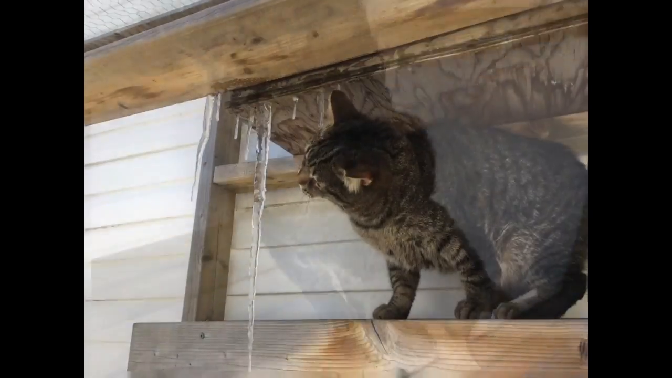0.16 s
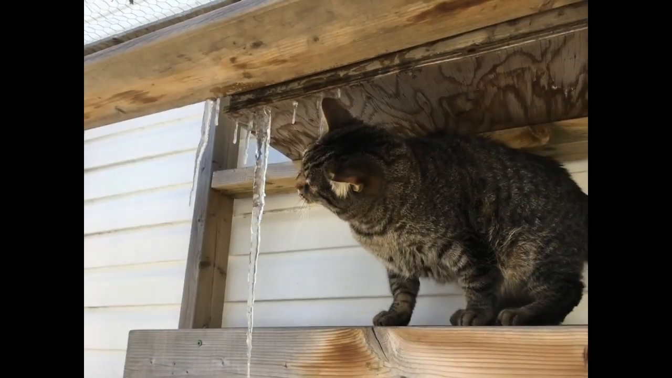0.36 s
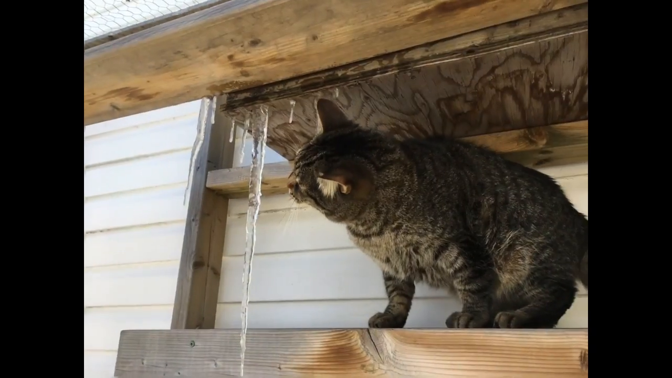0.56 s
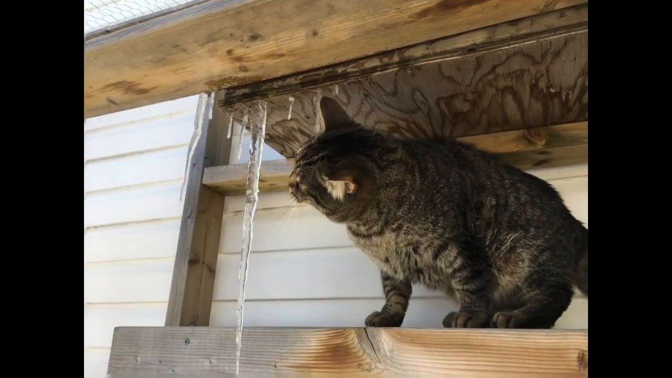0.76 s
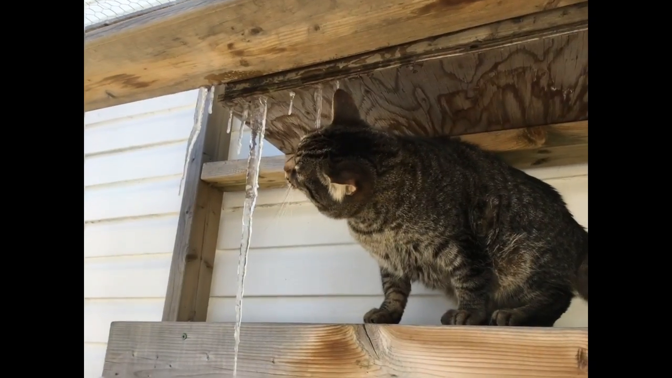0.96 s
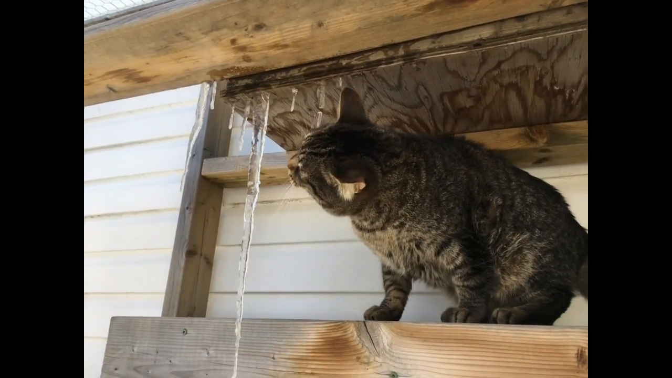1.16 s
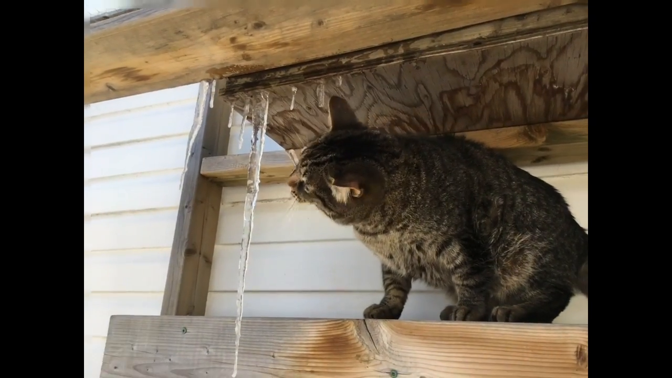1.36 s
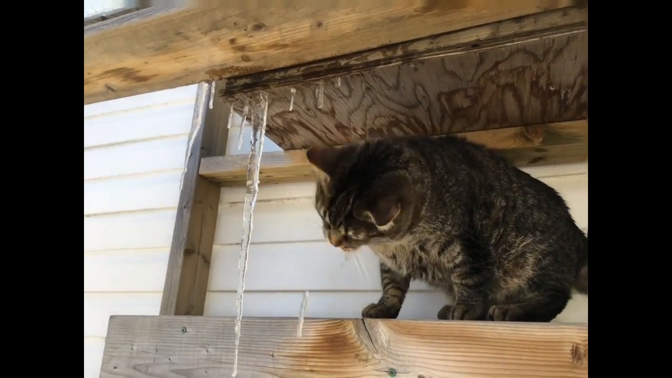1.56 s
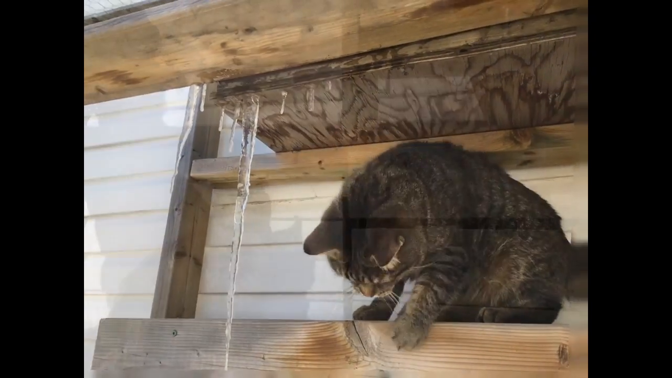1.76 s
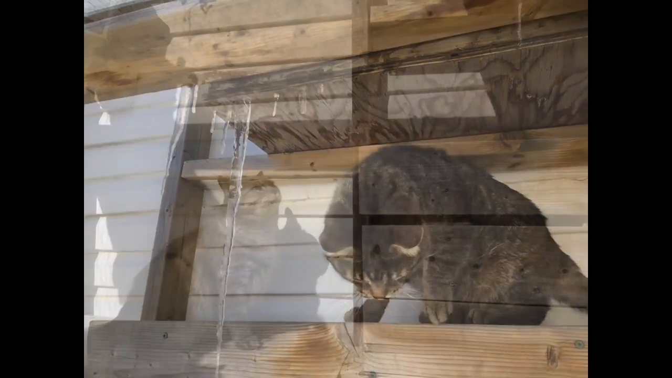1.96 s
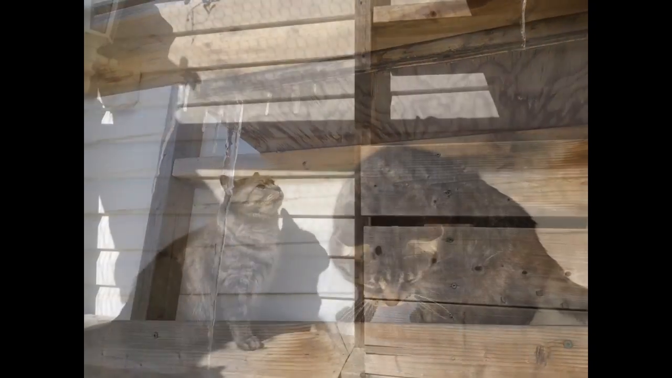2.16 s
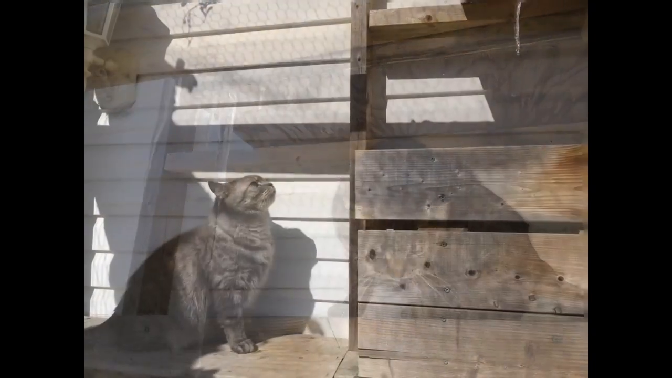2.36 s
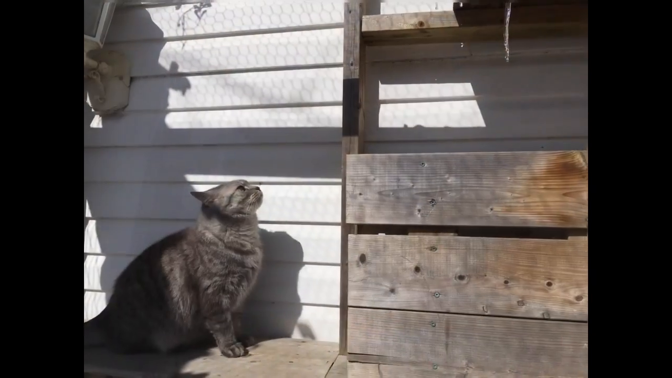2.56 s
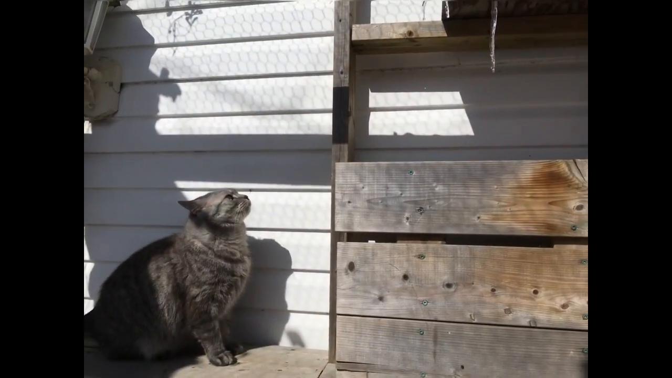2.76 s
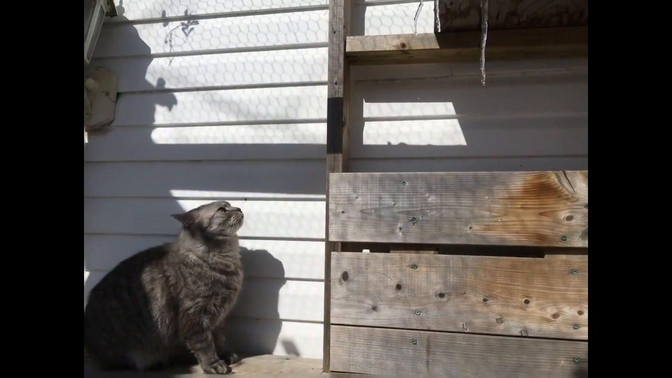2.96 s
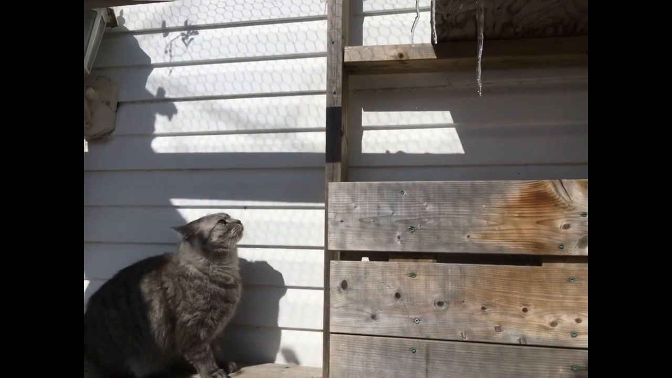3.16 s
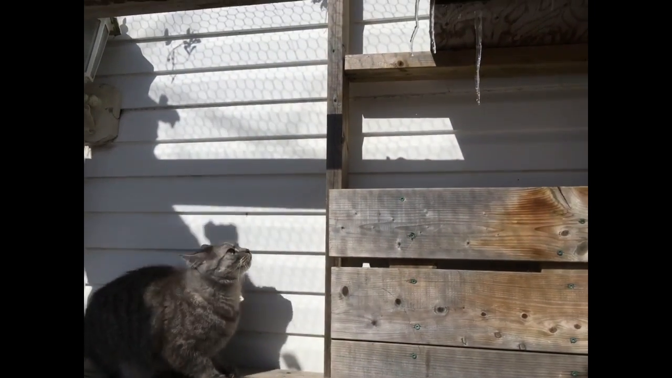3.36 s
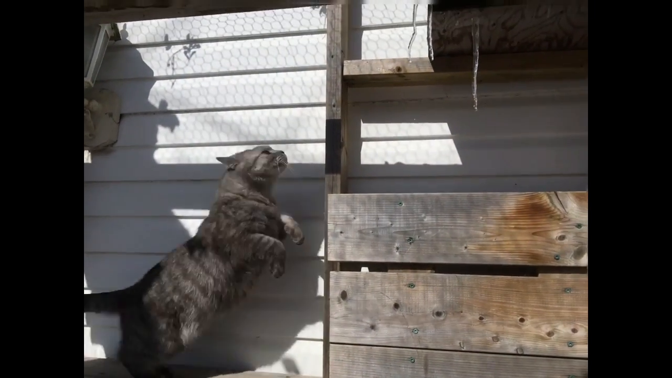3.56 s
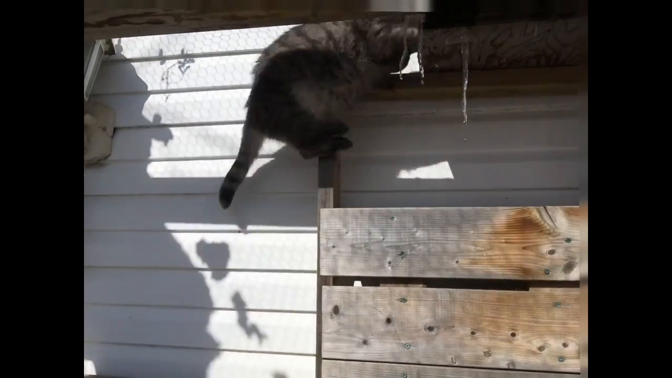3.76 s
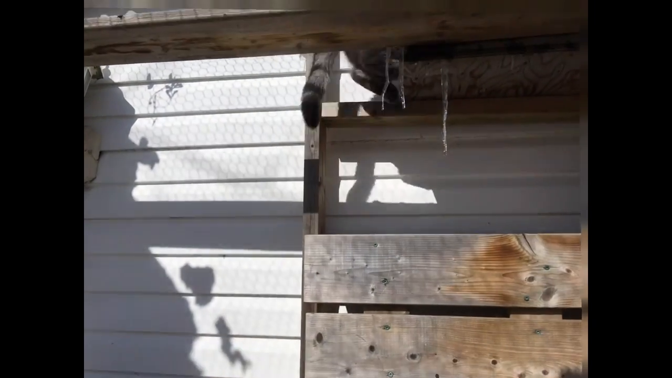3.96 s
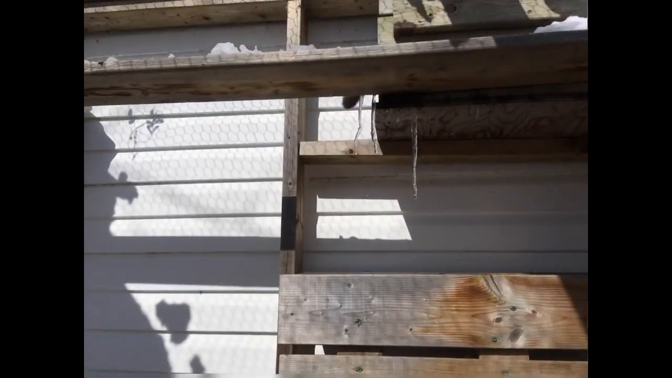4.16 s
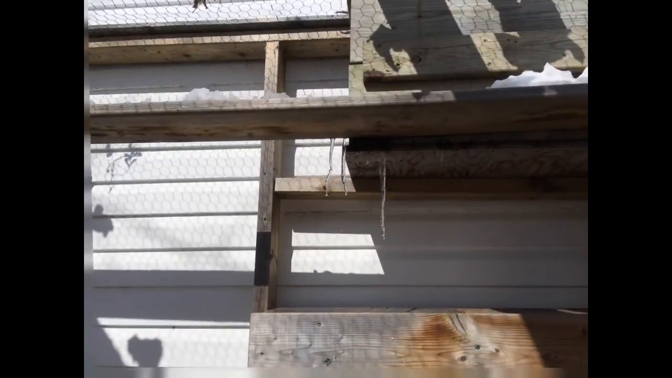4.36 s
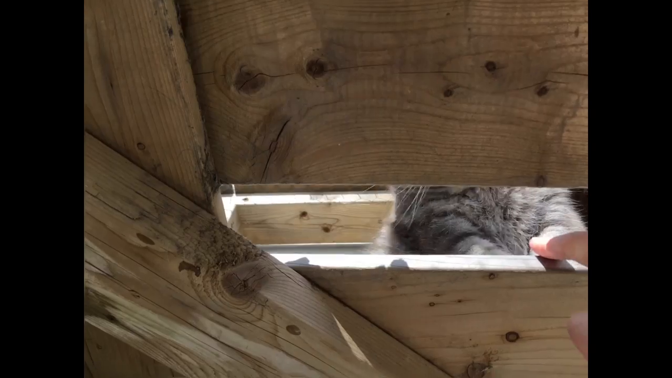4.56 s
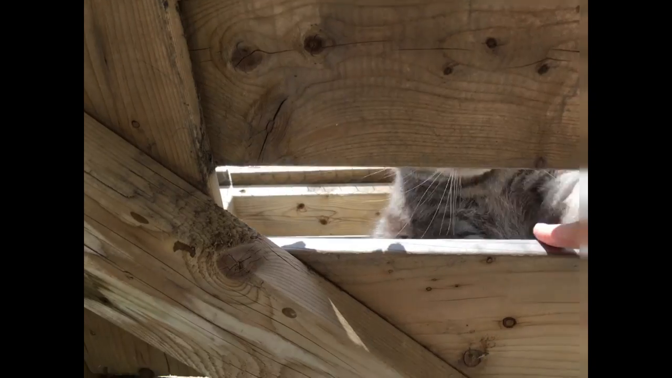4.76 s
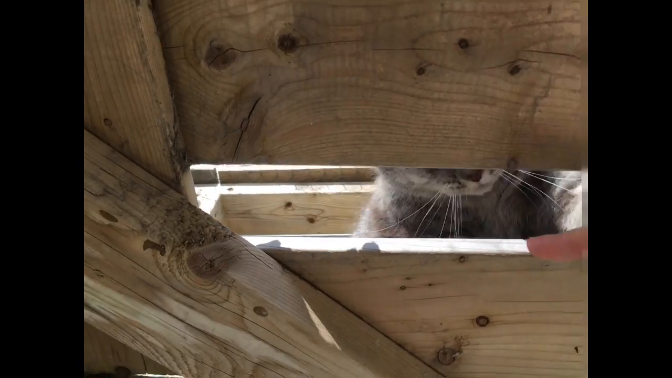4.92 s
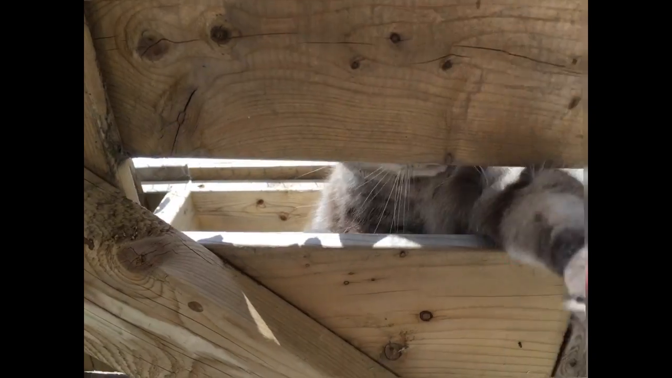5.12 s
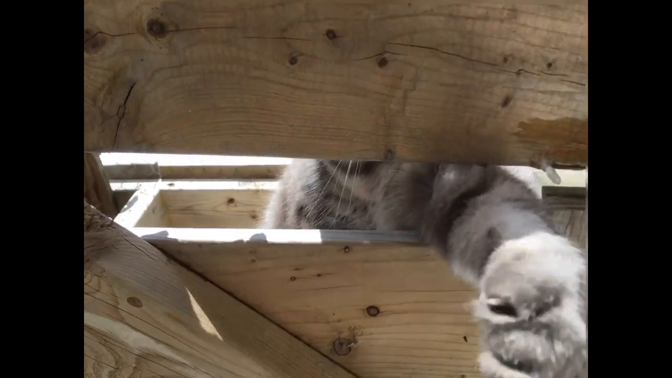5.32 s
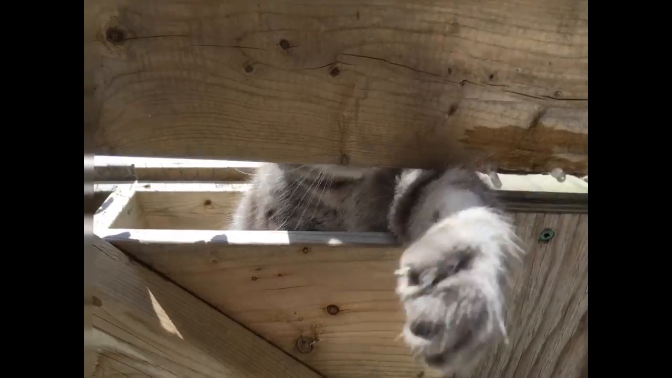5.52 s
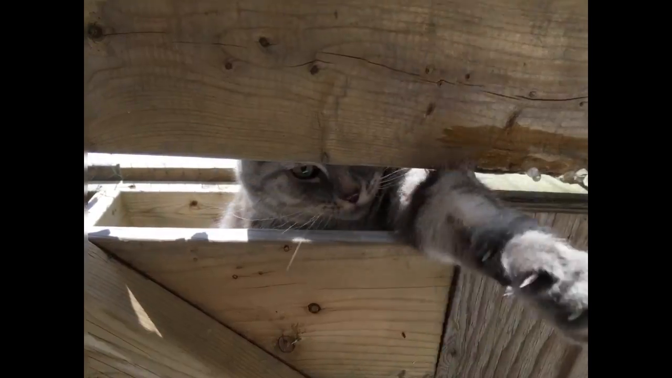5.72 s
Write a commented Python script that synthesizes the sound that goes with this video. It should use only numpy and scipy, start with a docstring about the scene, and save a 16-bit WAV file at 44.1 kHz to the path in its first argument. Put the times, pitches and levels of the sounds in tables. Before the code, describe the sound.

Close to the microphone in a small wooden outdoor pen, a low electric hum runs under faint tooth clicks. An icicle cracks loudly, then its shards clatter and ring on a plank as the hum dies away. After a quiet spell, a cat jumps with a sharp click, thumps and scrapes its claws on boards, then fur and paws brush softly against wood.

```python
"""A cat gnaws an icicle under the roof of a wooden outdoor pen; it snaps off and clatters onto a plank.
A second cat scrambles up the boards, its claws scrape, and fur brushes along the wood.
Breaks, clicks and rubbing are shaped noise; ringing ice, hollow knocks and boards are fading sine waves.
The pen adds a short echo; an electric hum of sine waves and noise dies away over a low outdoor rumble."""
import sys
import numpy as np
from scipy import signal
from scipy.fft import rfft, irfft, next_fast_len
from scipy.io import wavfile
from scipy.ndimage import uniform_filter1d

SR = 44100
rng = np.random.default_rng(int(sys.argv[2]) if len(sys.argv) > 2 else 0)


def generate_wav(sig):
    """Save sig (samples, or channels by samples) to the path in sys.argv[1] as 16-bit PCM at SR."""
    pcm = np.round(np.clip(np.atleast_2d(sig).T, -1, 1) * 32767).astype(np.int16)
    wavfile.write(sys.argv[1], SR, pcm)


N = 259656
T = np.arange(N) / SR

# tone of fur on wood, also used for the faint hiss: (frequency [Hz], level [dB])
FUR_COLOUR = [(290, -36.5), (500, -10), (749, -12), (1110, -9), (1320, -10), (1680, -12.5), (2870, -9),
              (4560, -13), (10200, -9), (11300, -5.5), (15800, -11.5)]


def undb(db):
    """Decibels to gain."""
    return 10 ** (np.asarray(db) / 20)


def unit(x):
    """Scale to an rms (average strength) of 1."""
    return x / np.sqrt(np.mean(x ** 2))


def curve(rows):
    """Gain over time from (time [s], level [dB]) rows."""
    s, db = np.transpose(rows)
    return undb(np.interp(T, s, db))


def add(out, s, x):
    """Mix x into out from time s."""
    i = int(s * SR)
    out[i:i + len(x)] += x[:N - i]


def fade(t, t60):
    """Exponential decay that has dropped 60 dB after t60 seconds."""
    return np.exp(-np.log(1000) * t / t60)


def colour(x, points):
    """Filter through (frequency [Hz], level [dB]) points, with no sound ahead of its cause."""
    size = 2 * next_fast_len(len(x))
    hz, db = np.transpose(points)
    f = np.maximum(np.arange(size // 2 + 1) * SR / size, 1)
    log_gain = np.log(undb(np.interp(np.log(f), np.log(hz), db)))
    # folding the cepstrum onto its first half makes the filter respond only after its input
    cepstrum = irfft(log_gain)
    cepstrum[1:size // 2] *= 2
    cepstrum[size // 2 + 1:] = 0
    response = np.exp(rfft(cepstrum))
    return irfft(rfft(x, size) * response)[:len(x)]


def walk(rate):
    """Slow random wandering with a spread near 1, given about rate new values a second."""
    k = int(SR / rate)
    steps = np.repeat(rng.standard_normal(N // k + 1), k)
    smooth = uniform_filter1d(uniform_filter1d(steps, k), k)
    return unit(smooth[:N])


def grains(size, spread_db):
    """Dense micro-fractures or slips, a few much larger than the rest."""
    boost_db = spread_db * np.minimum(rng.exponential(size=size), 4)
    return rng.standard_normal(size) * undb(boost_db)


def burst(points, db, t60):
    """One sharp break and its crumbling, levelled over the first 5 ms."""
    t = T[:8192]
    push = unit(grains(len(t), spread_db=2.5)) * fade(t, t60)
    push[0] = 3.5  # the sharp first break
    x = colour(push, points)
    return x * undb(db) / np.sqrt(np.mean(x[t < .005] ** 2))


def rings(modes, rise_s):
    """Struck modes (natural tones of an object) swell quickly and die away."""
    out, t = np.zeros(N), T[:SR // 4]
    for s, hz, db, t60 in modes:
        swell = 1 - np.exp(-t / rise_s)
        add(out, s, undb(db) * np.sin(2 * np.pi * hz * t) * fade(t, t60) * swell)
    return out


def strokes(rows):
    """Gain over time: each stroke swells to its peak and eases off, 20 dB down at its rise and fall times."""
    shape = 1.47  # 1 is a pointed swell, 2 a rounded one
    power = 0
    for s, db, rise, fall in rows:
        away = np.minimum(np.maximum((s - T) / rise, (T - s) / fall), 10)
        power = power + undb(db - 20 * away ** shape) ** 2
    return np.sqrt(power)


def rub(points, rows, spread_db, flutter_db):
    """Countless tiny slips of a soft surface over a rough one."""
    slips = unit(colour(grains(N, spread_db), points))
    flutter = undb(flutter_db * walk(90))
    return slips * strokes(rows) * flutter


def background(swell_db=1.86):
    """An electric motor and its rush of air die away over the quiet outdoors."""
    # motor shaft, its second harmonic, mains hum, faint whine, ahead of the fade:
    # (frequency [Hz], level [dB])
    hum_tones = [(29.3, -62), (58.7, -57.5), (120, -49.5), (581, -70.5)]
    # loudness of the hum and rush, fading out from about 1.8 s: (time [s], level [dB])
    fade_rows = [(0, 1), (.6, -1.5), (1.8, -.5), (2.2, -6), (2.45, -17.5), (2.7, -29), (5.88, -43)]
    # tone of the motor's rush of air: (frequency [Hz], level [dB])
    rush_colour = [(25, -11.5), (50, -5.5), (85, -1), (125, -12), (170, -9.5), (280, -15.5), (450, -23.5),
                   (900, -30), (2000, -41), (5000, -58.5)]
    # tone of the outdoor rumble: (frequency [Hz], level [dB])
    air_colour = [(12, -36.5), (20, -8), (81, -4.5), (203, -18.5), (284, -19.5), (496, -30.5), (586, -29.5),
                  (1250, -38.5), (1430, -37), (1790, -42), (2720, -38.5), (4890, -43.5), (11600, -40),
                  (15800, -39.5)]
    rush_db, air_db = -58.5, -61.5  # the rush level is ahead of its swell and the fade
    hum = sum(undb(db) * np.sin(2 * np.pi * (hz * T + rng.random())) for hz, db in hum_tones)
    rush = undb(rush_db) * unit(colour(rng.standard_normal(N), rush_colour))
    air = undb(air_db) * unit(colour(rng.standard_normal(N), air_colour))
    swell = undb(swell_db * walk(5.1))
    return (hum + rush * swell) * curve(fade_rows) + air


def strays(spread_db=2, spread_octaves=0.37, width=0.96):
    """Faint clicks scattered while the cats gnaw and climb, as rows like the clearer clicks in ticks."""
    # spells of fidgeting: (start [s], end [s])
    spells = [(.05, 1), (1.75, 2.2), (3.95, 4.15)]
    per_s, middle_db, middle_hz = 6, -71.5, 4000
    rows = []
    for start, end in spells:
        for slot in np.arange(start, end, 1 / per_s):
            pitch, size = rng.standard_normal(2)
            s = slot + rng.random() / per_s
            hz = middle_hz * 2 ** (spread_octaves * pitch)
            rows.append((s, hz, middle_db + spread_db * size, width))
    return rows


def ticks(skirt_db=-30, t60=0.022):
    """Small contacts, each with one broad resonance."""
    # clearer clicks of teeth, claws and chips of ice:
    # (time [s], centre [Hz], level [dB], width [octaves])
    clear_clicks = [(0.101, 1700, -60, 0.5), (.543, 7500, -56.5, .35), (.597, 3000, -66, 1.4),
                    (0.649, 8300, -55, 0.28), (.694, 10300, -57, 0.11), (.735, 1110, -65, 0.078),
                    (0.9, 3020, -59, 0.37), (1.102, 2500, -56, 0.16), (1.4, 4470, -60.5, 0.92),
                    (1.726, 7350, -37, 0.35), (1.729, 1070, -47, 0.78), (1.761, 3700, -53, 0.16),
                    (1.835, 1475, -63.5, 1.7), (2.19, 1800, -63, .35), (2.485, 1840, -65.5, 0.31),
                    (2.582, 2325, -63.5, 0.73), (3.512, 13000, -59, .5), (3.552, 2200, -54, 1.9),
                    (3.559, 7100, -58.5, 0.99), (3.7058, 2630, -36.5, 0.75), (3.928, 1360, -54, 1.7),
                    (4.045, 5980, -58.5, 2.1), (4.152, 3160, -48, 0.36), (4.282, 1970, -46.5, 0.48),
                    (4.487, 2470, -59, 2.5), (4.529, 2800, -62, 1.5), (4.981, 13100, -58, 0.15),
                    (5.317, 14100, -48, 0.18)]
    out, hz = np.zeros(N), np.geomspace(100, 20000, 120)
    for s, centre, db, width in clear_clicks + strays():
        hump = np.exp(-.5 * (np.log2(hz / centre) / width) ** 2)
        shape = undb(skirt_db) + hump
        add(out, s, burst(np.c_[hz, 20 * np.log10(shape)], db, t60))
    return out


def cracks(trim_db=-1.0):
    """Ice breaking and landing, and claws striking home: one colour, tilted dull or bright."""
    # brittle cracks and impacts, levels ahead of the trim:
    # (time [s], level [dB], bass tilt [dB], treble tilt [dB], t60 [s])
    breaks = [(.112, -54, 21, -8, 0.16), (1.102, -53.5, 10, -12, 0.021), (1.213, -18.5, -6, 8, 0.026),
              (1.52, -50, -19, 3.5, 0.017), (1.7267, -37.5, -29, -15, 0.02),
              (1.7608, -49.5, 12, -25, 0.043), (1.917, -29, -10.5, -12.5, 0.11),
              (1.9241, -20.5, -6, 0.5, 0.025), (1.9776, -37, 12, 8, 0.0048),
              (2.0263, -29.5, -3.5, -7.5, 0.062), (2.0547, -30.5, -16.5, -9, 0.063),
              (2.091, -40, -4.5, -11.5, 0.077), (2.298, -40.5, -7.5, 12.5, 0.092),
              (2.325, -54, 5.5, -16, 0.051), (2.408, -53, 5, -14, 0.07), (3.697, -46, -17, -11, 0.02),
              (3.7044, -32, -27.5, -4, 0.014), (3.9922, -32, -2, -4, .034),
              (5.3011, -46.5, -13.5, 11, 0.0073), (5.317, -44, -4, 3.5, 0.012)]
    # where the bass tilt, level pivot and treble tilt sit: (frequency [Hz])
    tilt_hz = [405, 3344, 13700]
    # tone shared by all cracks: (frequency [Hz], level [dB])
    shared_colour = [(100, -10), (400, -1.5), (1400, 0.5), (3300, 0.5), (7500, -3), (13500, 0.5)]
    out = np.zeros(N)
    hz, shared_db = np.transpose(shared_colour)
    for s, db, bass, treble, t60 in breaks:
        tilt = np.interp(np.log(hz), np.log(tilt_hz), [bass, 0, treble])
        add(out, s, burst(np.c_[hz, shared_db + tilt], db + trim_db, t60))
    return out


def thumps():
    """Brief hollow knocks of jaw, ice and paws, each one fading tone."""
    # knocks: (time [s], pitch [Hz], level [dB], t60 [s])
    hollow_knocks = [(.112, 324, -43.5, 0.057), (1.103, 817, -46.5, 0.042), (2.413, 884, -52.5, .035),
                     (3.93, 213, -52.5, 0.13), (3.995, 181.6, -46, 0.11), (4.205, 217, -57, 0.11)]
    return rings(hollow_knocks, rise_s=0.00068)


def planks(trim_db=-3, spot_db=2.0, detune=.006):
    """Boards ring when struck, a little differently at every spot; soft paws reach only the low modes."""
    # blows; a cat's weight damps the board, levels ahead of the trim:
    # (time [s], level [dB], hardness as a corner [Hz], share of the ring time left [0-1])
    blows = [(0.114, -68, 400, 0.73), (1.918, -34.5, 2000, 0.69), (1.978, -36.5, 300, 0.17),
             (2.056, -49, 2010, 0.97), (2.095, -49, 2000, 0.78), (2.41, -66, 1470, 1),
             (3.703, -48.5, 586, 0.61), (3.998, -38.5, 490, 0.56), (5.537, -60.5, 716, .6)]
    # modes of a plank, ahead of the chance at each spot and the damping:
    # (frequency [Hz], level [dB], t60 [s])
    modes = [(214.4, -6, 0.22), (268.5, -6, 0.26), (424, -6, 0.1), (548.6, -5.5, 0.35), (611, -8, 0.085),
             (958.5, 3.5, 0.12), (1024, 7, 0.078), (1275, -5, .09), (1500, -6.5, 0.23), (1637, 5, 0.072),
             (2140, -3, 0.098)]
    out, t = np.zeros(N), T[:SR // 3]
    for s, db, corner, ring in blows:
        for hz, mode_db, t60 in modes:
            size, pitch = rng.standard_normal(2)
            softness = np.hypot(1, (hz / corner) ** 2)
            level = undb(db + mode_db + trim_db + spot_db * size)
            gain = rng.choice([-1, 1]) * level / softness
            tone = np.sin(2 * np.pi * hz * (1 + detune * pitch) * t)
            add(out, s, gain * tone * fade(t, t60 * ring))
    return out


def rustling():
    """Soft, dull rubbing made of tiny slips, with an uneven flutter."""
    # strokes: (peak time [s], level [dB], rise [s], fall [s])
    rows = [(.64, -69, 0.02, .03), (.742, -67.5, 0.016, 0.014), (.86, -67, 0.018, 0.08),
            (2.72, -75.5, 0.076, 0.19), (2.87, -67, 0.082, 0.17), (3.041, -66.5, .04, .07),
            (3.13, -64, 0.092, 0.046), (3.53, -58, 0.05, 0.084), (3.701, -59.5, 0.033, .03),
            (3.98, -56.5, .04, 0.031), (5.549, -71, .015, .07)]
    # tone: (frequency [Hz], level [dB])
    points = [(300, -7.5), (900, -4), (1700, -6), (2700, -2), (4500, -11.5), (8000, -21), (15000, -13.5)]
    return rub(points, rows, spread_db=6, flutter_db=3.5)


def ice():
    """Snapped icicles and loose shards ring in their modes, the shortest shards highest."""
    # an icicle snaps and rings: (time [s], level [dB])
    snaps = [(1.213, -8), (5.317, -38.5)]
    # modes of a hanging icicle, levels relative to the snap: (frequency [Hz], level [dB], t60 [s])
    icicle_modes = [(2894, -2, 0.021), (3410, -14, .032), (3560, -25.5, .05), (9390, -10, .024),
                    (12280, -7, .005)]
    # shards set ringing: (time [s], pitch [Hz], level [dB])
    shard_hits = [(1.4, 14600, -50), (1.518, 14600, -61), (1.7605, 14700, -51.5), (1.918, 9430, -22),
                  (1.9245, 14540, -20), (2.054, 15350, -33), (2.089, 15000, -33), (2.3, 14800, -41)]
    # modes of a short shard, relative to its hit: (pitch ratio [1], level [dB], t60 [s])
    shard_modes = [(1, 2.5, 0.044), (1.2, -16.5, 0.015), (0.95, -10, 0.0623)]
    icicles = [(s, hz, db + mode_db, t60)
               for s, db in snaps for hz, mode_db, t60 in icicle_modes]
    shards = [(s, hz * ratio, db + mode_db, t60)
              for s, hz, db in shard_hits for ratio, mode_db, t60 in shard_modes]
    return rings(icicles + shards, rise_s=.001)


def hiss(edge_s=.02):
    """A faint, even, bright hiss from 1.23 to 1.62 s with short soft edges."""
    # its one spell: (start [s], end [s], level [dB])
    spell = (1.23, 1.62, -69)
    start, end, db = spell
    gate = np.clip(np.minimum(T - start, end - T) / edge_s + .5, 0, 1)
    return undb(db) * gate * unit(colour(rng.standard_normal(N), FUR_COLOUR))


def creak(width_hz=800):
    """The icicle creaks between the teeth: uneven stick-slip excites one broad, rising resonance."""
    # loudness: (time [s], level [dB])
    loudness = [(1.345, -100), (1.356, -64), (1.37, -60.5), (1.382, -62), (1.395, -66), (1.415, -100)]
    # rising centre of the resonance: (time [s], pitch [Hz])
    pitch_rows = [(1.35, 2232), (1.41, 2460)]
    pitch = np.interp(T, *np.transpose(pitch_rows))
    phase = 2 * np.pi * np.cumsum(pitch) / SR
    # two random strengths smear the tone into a band
    band = walk(width_hz) * np.cos(phase) + walk(width_hz) * np.sin(phase)
    return band * curve(loudness)


def gusts():
    """Puffs of wind thud on the microphone as short swells of low noise."""
    # soft puffs: (peak time [s], level [dB], length [s])
    puffs = [(2.523, -50, .018), (2.582, -52.5, 0.0099), (3.385, -47.5, 0.016)]
    points = [(20, -14.5), (45, 2), (65, 6.0), (110, -9.5), (300, -47), (2000, -90.5)]  # (Hz, dB)
    rumble = unit(colour(rng.standard_normal(N), points))
    swells = sum(undb(db) * np.exp(-.5 * ((T - s) / length) ** 2) for s, db, length in puffs)
    return rumble * swells


def brushing():
    """Paws and fur brush the wood in countless tiny slips."""
    # strokes: (peak time [s], level [dB], rise [s], fall [s])
    rows = [(3.55, -70, 0.056, 0.2), (3.875, -62, 0.072, .06), (3.992, -39.5, .032, 0.0075),
            (4.6, -58, 0.017, 0.087), (4.745, -61, 0.055, 0.094), (4.882, -54.5, 0.043, 0.09),
            (4.991, -60, 0.014, .11), (5.13, -64, 0.066, 0.061), (5.2, -65, 0.071, 0.057),
            (5.32, -63.5, 0.12, 0.17), (5.721, -74, 0.32, 0.45)]
    return rub(FUR_COLOUR, rows, spread_db=1.0, flutter_db=2.5)


def claws(comb_hz=655, bounce=0.82):
    """Rapid slips; the bounce off the board close by combs the spectrum."""
    # claws catch on an edge: (peak time [s], level [dB], rise [s], fall [s])
    snag_rows = [(4.152, -45, 0.0044, 0.03)]
    # tone of the catch: (frequency [Hz], level [dB])
    snag_colour = [(1200, -43), (2200, -20.5), (3100, -1), (5200, -19), (7500, 8), (9300, -5), (11000, -2),
                   (13000, -16), (15500, -13)]
    # claws bite into a board, slide, then dig in: (peak time [s], level [dB], rise [s], fall [s])
    drag_rows = [(4.195, -45.5, 0.00096, 0.027), (4.228, -49.5, 0.031, 0.1), (4.289, -37.5, 0.02, 0.032)]
    # tone of the slide: (frequency [Hz], level [dB])
    drag_colour = [(400, -29), (700, -13), (930, -18.5), (1250, -5.5), (1600, -10), (1950, -2),
                   (3100, -6.5), (3900, -14.5), (5300, 0), (7700, -9.5), (8300, -12), (9500, -6.5),
                   (15500, -19)]
    slips, lag = grains(N, spread_db=2.5), int(SR / comb_hz)
    slips = slips + bounce * np.roll(slips, lag)
    drag = unit(colour(slips, drag_colour)) * strokes(drag_rows)
    snag = unit(colour(slips, snag_colour)) * strokes(snag_rows)
    return drag + snag


def pen(x, wet_db, t60, gap_s=0.003, build_s=.002):
    """Short, dense echoes between siding, roof and boards; the wood soaks up some treble."""
    t = T[:SR // 3]
    build = 1 - np.exp(-np.maximum(t - gap_s, 0) / build_s)
    tail = rng.standard_normal(len(t)) * fade(t, t60) * build
    tail = tail / np.sqrt(np.sum(tail ** 2))
    tail = colour(tail, [(200, 7.5), (1500, 1.5), (4500, -5.0), (15000, -5.5)])  # (Hz, dB)
    return x + undb(wet_db) * signal.fftconvolve(x, tail)[:N]


def scene():
    """All sources at one microphone; close, directed sounds carry less of the pen's echo."""
    blows = ticks() + cracks() + thumps() + planks()
    close = rustling() + ice() + hiss() + creak() + brushing() + claws()
    in_pen = pen(blows, wet_db=-9, t60=0.13) + pen(close, wet_db=-14.5, t60=.12)
    return (in_pen + background() + gusts())[None]


def record(dry):
    """The microphone bends the treble by a few dB; the recorder cuts the top."""
    # microphone tone: (frequency [Hz], level [dB])
    microphone = [(3400, 0), (4700, -2), (6200, 0.5), (10000, -2.5), (14000, 1)]
    top_hz = 15900
    low_pass = signal.ellip(8, .2, 70, top_hz, fs=SR, output="sos")
    return signal.sosfilt(low_pass, colour(dry[0], microphone))[None]


dry = scene()
out = record(dry)
generate_wav(out)
```